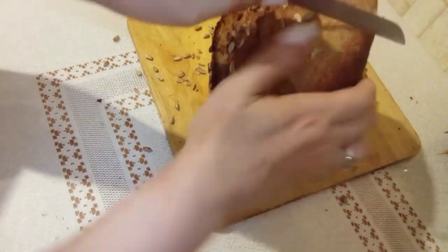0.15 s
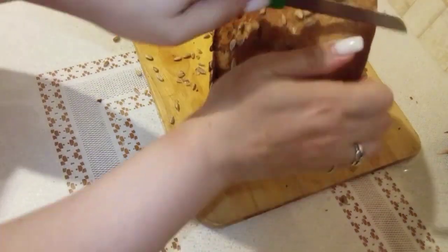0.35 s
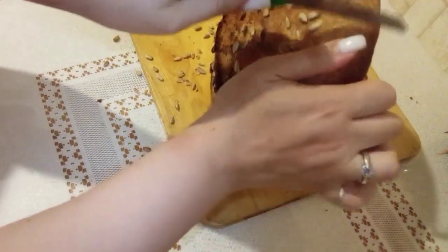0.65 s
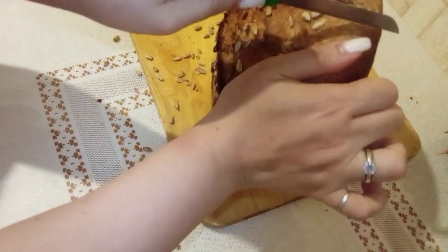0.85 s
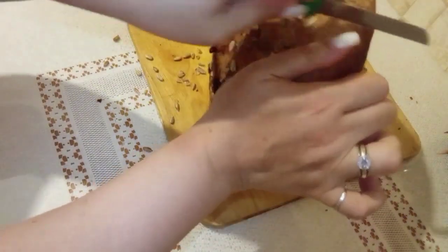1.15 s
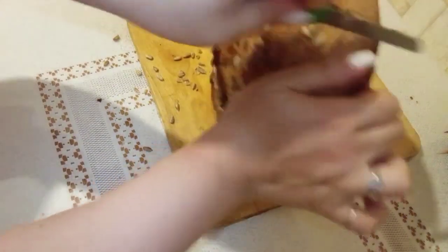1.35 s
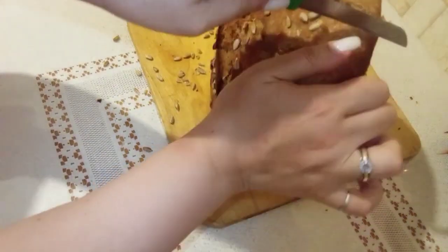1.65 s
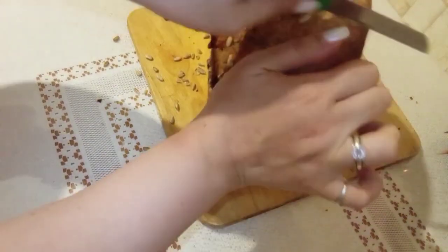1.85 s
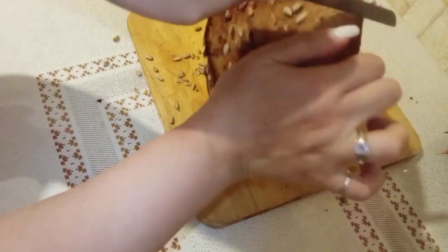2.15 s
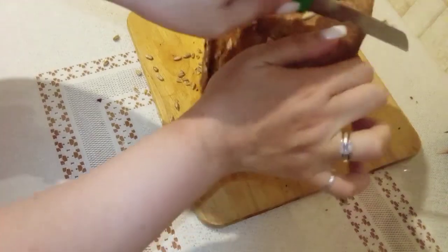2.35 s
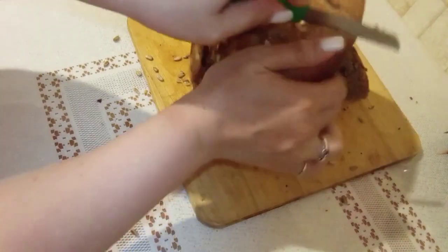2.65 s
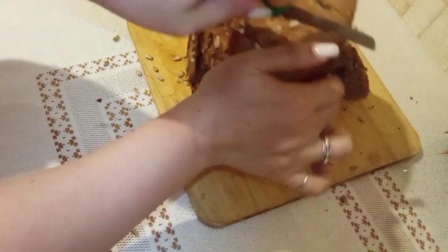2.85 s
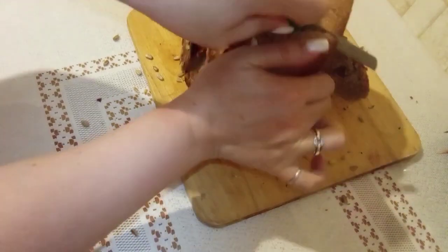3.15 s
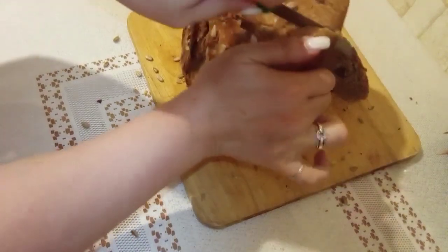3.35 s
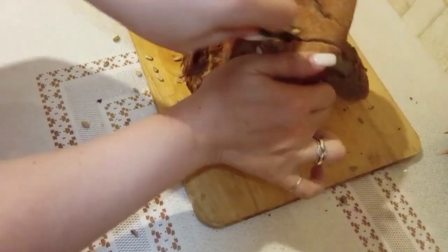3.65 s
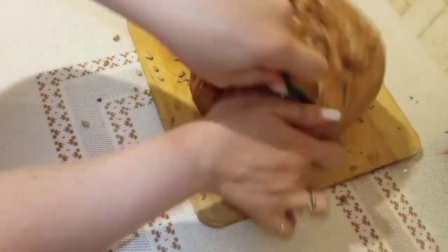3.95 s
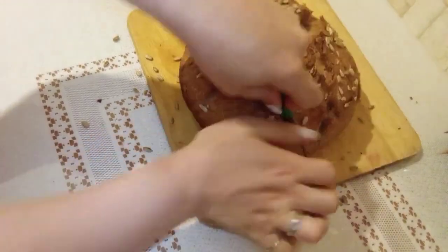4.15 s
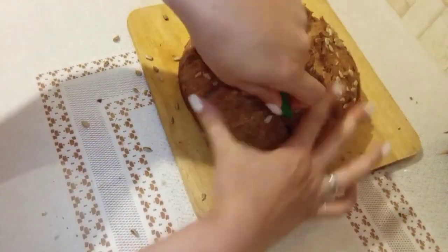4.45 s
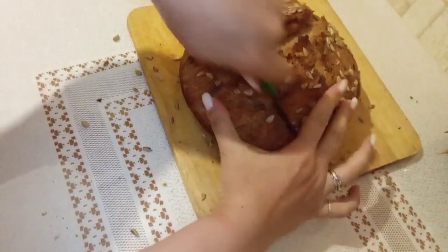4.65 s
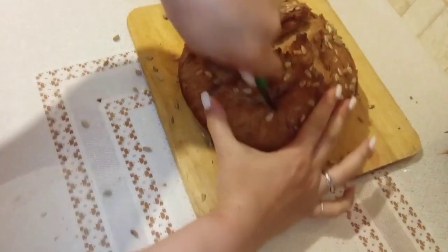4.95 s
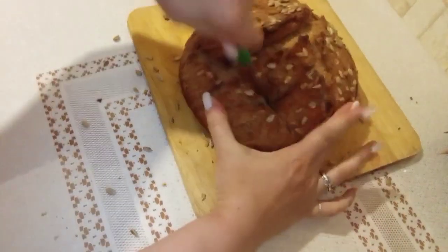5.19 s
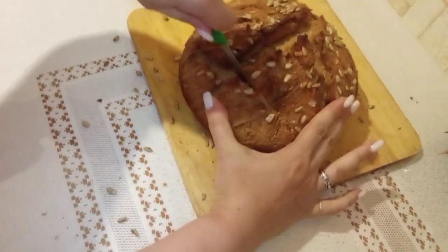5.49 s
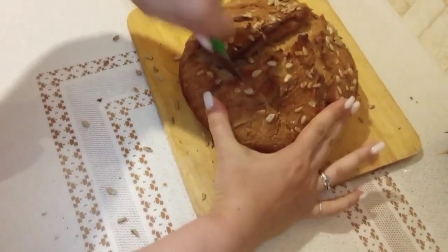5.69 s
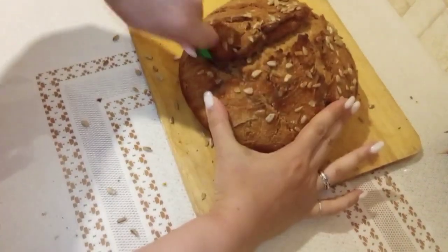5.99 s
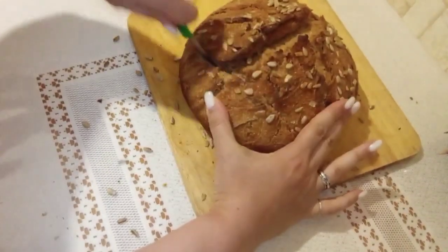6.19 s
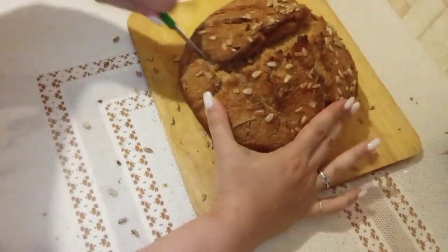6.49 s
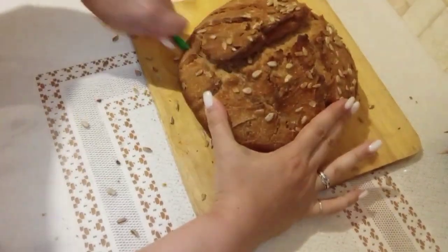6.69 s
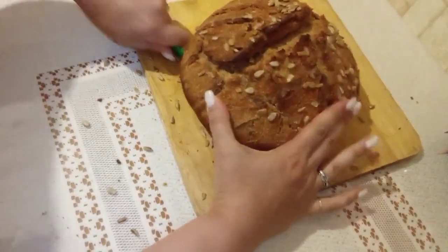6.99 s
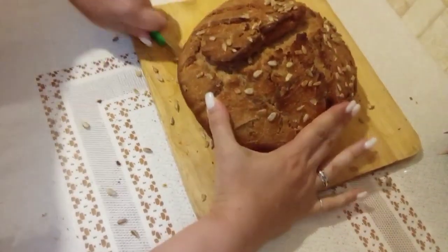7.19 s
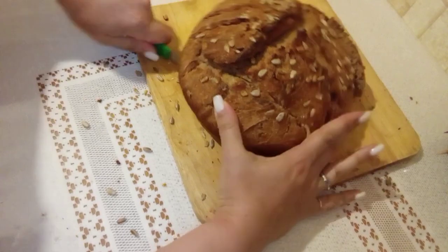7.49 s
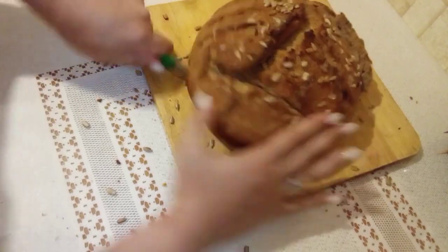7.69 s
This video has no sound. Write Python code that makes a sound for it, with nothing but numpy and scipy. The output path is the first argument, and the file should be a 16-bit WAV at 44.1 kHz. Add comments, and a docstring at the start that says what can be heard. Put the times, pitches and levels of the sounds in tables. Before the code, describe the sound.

Dry, close sound of hard bread being sawn. Quiet strokes about five a second carry fine crackle and muffled hollow jolts, with sharp crust snaps between. A burst of strong cracks arrives midway, then slower, heavier crunching strokes with ringing flakes, dull board knocks and two deeper thumps. Tiny crumb ticks and short hisses trail along. The cutting dies down into faint appliance hum in a small room.

```python
"""In a small kitchen, a serrated knife saws through a crusty loaf on a wooden board.
The catching teeth break the crust in clumps of tiny random cracks, and jolt the loaf, board and table.
Single flakes and seeds snap as ringing bursts of noise. Blade squeaks, rubs and the hissing tails after
some snaps are noise in a gliding resonance; low thumps and short low groans are decaying tones.
Crumbs tick over faint hiss and appliance hum."""
import sys
import numpy as np
from scipy import signal
from scipy.io import wavfile
from scipy.ndimage import uniform_filter1d

SR = 44100
rng = np.random.default_rng(int(sys.argv[2]) if len(sys.argv) > 2 else 0)


def wav_record(signal):
    """Record a signal, one row per channel, as 16-bit PCM in the file named by sys.argv[1]."""
    frames = np.transpose(np.atleast_2d(signal))
    bounded = np.clip(frames, -1, 1)
    # unit amplitude maps onto the largest positive 16-bit level
    quanta = np.round(bounded * 32767).astype(np.int16)
    wavfile.write(sys.argv[1], SR, quanta)


N = 345303
TIME = np.arange(N) / SR

# pushes and pulls of the knife, from deep cuts to light drags; levels and times are scaled per part later:
# start_s, rise_s, hold_s, release_s (per 20 dB), crust_db, board_db, table_db, fizz_db, hollow_hz
STROKES = [ (.95, .11, 0.05, 0.09, -57, -57.5, -47, -64.5, 362),
           (1.149, 0.079, 0.012, 0.02, -51, -47.5, -44, -59, 417),
           (1.352, 0.09, 0.0047, 0.0569, -37, -47, -58, -45.5, 765),
           (1.57, 0.049, .034, 0.07, -45, -57.5, -55, -54.5, 725),
           (1.771, 0.097, .052, 0.06, -42, -47.5, -58, -51, 428),
           (2.005, .087, .034, 0.08, -50, -56.5, -49.5, -58.5, 358),
           (2.235, .08, .03, 0.09, -56, -54.5, -50, -57.5, 335),
           (2.325, 0.052, 0.0046, .067, -48.5, -51.5, -70, -50.5, 335),
           (2.388, 0.065, 0.07, .1, -57.5, -55, -54, -69.5, 320),
           (2.799, 0.067, 0.0048, .03, -43, -66.5, -60.5, -56, 600),
           (3.066, .068, .022, 0.0332, -28, -41.5, -45, -36, 720),
           (3.157, 0.016, 0.025, 0.11, -42.5, -50, -54.5, -49, 606),
           (3.209, .12, 0.03, 0.08, -36.5, -46, -57, -43.5, 363),
           (3.434, .066, 0.037, .055, -31.5, -39.5, -42, -39, 648),
           (3.548, 0.13, 0.042, 0.03, -43, -51, -48, -54, 570),
           (3.774, 0.063, 0.011, 0.06, -43.5, -72, -67, -51, 507),
           (3.893, 0.054, 0.037, 0.1, -62.5, -56.5, -52, -69, 430),
           (4.012, .11, .045, 0.16, -55.5, -58.5, -68.5, -75, 357),
           (4.171, .017, .002, 0.053, -34.5, -35, -35, -47, 322),
           (4.59, .115, .052, .075, -45.5, -48.5, -55.5, -51, 640),
           (4.825, 0.067, 0.033, .06, -32, -33.5, -40.5, -41.5, 710),
           (5.009, 0.017, 0.11, 0.1, -60.5, -52, -55, -72.5, 680),
           (5.224, .016, .051, 0.04, -34, -32, -42.5, -44, 700),
           (5.337, 0.078, 0.0072, 0.25, -59, -60.5, -56.5, -77, 607),
           (5.572, .04, .033, 0.0628, -30.5, -37.5, -35.5, -39.5, 560),
           (5.658, 0.098, .15, .055, -48, -57.5, -47.5, -55, 560),
           (5.962, .014, .018, .048, -34, -40.5, -38, -42, 322),
           (6.061, 0.018, 0.0032, .05, -45.5, -50.5, -44, -50, 318),
           (6.244, .055, 0.026, 0.0577, -35, -42.5, -48, -47.5, 286),
           (6.42, .085, 0.019, 0.01, -62.5, -57.5, -52, -74, 217),
           (6.565, 0.083, .034, .05, -35, -46, -42, -44, 346),
           (6.734, 0.09, .076, 0.17, -55.5, -67, -75, -70, 350),
           (6.916, .04, .092, 0.038, -38, -39.5, -48.5, -62, 320),
           (7.122, 0.048, 0.044, 0.24, -72, -72, -69, -75, 690),
           (7.269, 0.052, 0.051, 0.09, -60.5, -63, -85, -71, 1030),
           (7.423, 0.058, 0.016, 0.12, -64, -69, -58, -63.5, 850),
           (7.58, 0.22, .035, .05, -59, -62, -78.5, -69.5, 667)]
# flakes and seeds that snap; level_db sets the whole snap, knock_db and crack_db are relative to its ring:
# time_s, level_db, ring_hz, knock_db, crack_db
SNAPS = [(0.308, -38, 4670, -36, 0), (0.435, -52, 1930, -9, 0), (0.467, -56.5, 4550, -15, 8),
         (0.818, -31, 750, -8, 2.5), (0.964, -53.5, 5330, -31, -5), (1.445, -30, 3530, -32, 5),
         (1.676, -33, 10100, -22, -2.5), (1.769, -51, 9800, -28, -14), (2.049, -45, 3630, -17, 2),
         (2.325, -35, 4800, -26, 2), (2.384, -37, 5860, -33, 2), (2.648, -26.5, 4950, -44, 6),
         (2.748, -45, 1790, -16, -16), (2.951, -28.5, 2830, -45, 5.5), (3.053, -35.5, 2900, -39, 5),
         (3.066, -29, 5040, -45.5, -10.5), (3.09, -31, 1900, -23, 9), (3.473, -29, 1980, -27, -1),
         (3.495, -19, 5250, -14, 4), (3.532, -19.5, 2440, -1, 3), (3.688, -29.5, 1850, -6, -13),
         (3.855, -28, 4800, -18, -2), (4.05, -34, 4800, -7.5, -14), (4.187, -21.5, 1010, 11, 8),
         (4.31, -43, 1410, -23, -18), (4.375, -44, 1440, -20, -23), (4.395, -49, 1400, -21, -20),
         (4.435, -44, 3100, -17, -4), (4.485, -33.5, 2370, -33, -18), (4.512, -33.5, 2560, -25, -9),
         (4.538, -32.5, 10000, -21, -8), (4.603, -28, 4270, -22, -15), (4.693, -31, 770, -1, -1),
         (4.813, -32, 5130, -25.5, -10), (4.863, -26.5, 1460, -15.5, -14), (4.876, -25.5, 4830, -25, -2),
         (4.893, -24.5, 794, 2, -3), (4.917, -20.5, 760, -5, -2), (5.171, -47, 14500, -30, -6),
         (5.198, -45, 4740, -34, 0), (5.211, -27.5, 14200, -31, -18), (5.235, -26.5, 735, -9, -7),
         (5.281, -19.5, 3000, -10, 5.5), (5.389, -38, 2300, -18, -8), (5.415, -34.5, 5000, -34, 1),
         (5.588, -21.5, 1340, -35, -15.5), (5.608, -20.5, 1620, -8.5, -1), (5.611, -18.5, 4460, -10.5, -8),
         (5.642, -19, 1670, -19, -3.5), (5.855, -29, 3700, -8, 2), (5.898, -29, 4960, -39, -8),
         (5.975, -26.5, 5200, -1, 3), (6.177, -28.5, 2570, -45, -3.5), (6.275, -29, 4640, -15, 0),
         (6.592, -32, 1590, -16, -4.5), (6.63, -25, 1100, -21, 0), (6.948, -29.5, 1460, -13, -12),
         (7.44, -43, 2570, -25, -27)]
# blade squeaks and rubs, and the hissing tails that die away after some snaps:
# start_s, length_s, pitch_hz, glide_hz, width_hz, level_db, fade_db
SQUEAKS_AND_TAILS = [(0.647, 0.02, 10200, 0, 1200, -74, 2), (1.669, 0.063, 10000, -200, 700, -63.5, 7),
                     (2.647, 0.1, 5300, -1300, 3800, -54, 29), (2.959, 0.097, 2870, -200, 1310, -65.5, 9),
                     (4.608, 0.042, 4260, 0, 900, -60, 11), (6.1, 0.067, 4100, -250, 300, -62.5, 16),
                     (6.185, 0.062, 2730, -300, 800, -64, 11), (6.198, 0.1, 4300, 0, 130, -67, -2),
                     (6.372, 0.18, 4830, -100, 170, -65, 5), (6.492, 0.044, 1200, 100, 700, -64, 0),
                     (6.81, 0.069, 5030, 100, 700, -60.5, 11), (7.308, 0.054, 1200, -100, 400, -58.5, 4)]
# low thumps and short low groans that die away: time_s, pitch_hz, level_db, t60_s
THUMPS_AND_GROANS = [(1.93, 133, -46, .3), (3.985, 98, -57, 0.16), (4.196, 80, -45, 0.25),
                     (5.636, 130.8, -29, 0.36), (5.991, 127.4, -30.5, .16), (6.485, 200, -54, 0.22),
                     (7.478, 124, -49, 0.19)]
# loose crumbs shifting under the hands: time_s, level_db
CRUMBS = [(0, -100), (.9, -90), (3.7, -62), (4.3, -70.5), (4.6, -63), (5.6, -80.5), (7.2, -79.5),
          (7.83, -82)]
# tone colour of the crackling crust: pitch_hz, relative_db
CRUST = [(530, -42.5), (900, -2), (1250, -7), (1420, 1), (1890, 1.5), (2040, -0.5), (2290, 1.5), (3470, 0),
         (3710, 0.5), (5100, 2), (6300, -0.5), (7940, -14.5), (9000, -14.5), (11700, -28), (19800, -120)]
# tone colour of the fine-crumb fizz: pitch_hz, relative_db
FIZZ = [(4120, -53.5), (7000, -1), (7940, -9), (9560, 0), (10000, -1), (13400, -17), (15100, -2),
        (16100, -21), (16300, -23), (16500, -37)]
# tone colour of the jolted loaf: pitch_hz, relative_db
LOAF = [(120, -32.5), (210, -2), (290, 1.5), (400, -2.5), (470, -2), (560, 4.5), (750, -1), (1000, 0.5),
        (1300, -9.5), (2000, -16.5), (4000, -41.5)]
# tone colour of the thudding table: pitch_hz, relative_db
TABLE = [(25, -50.5), (48, -30.5), (62, -3), (80, -20.5), (100, -4.5), (130, 1), (160, -8), (200, -9.5),
         (250, -15.5), (320, -16.5), (600, -59.5)]
# tone colour of the background hiss: pitch_hz, relative_db
HISS = [(25, -22), (50, -13), (80, -9), (115, 0), (160, -6), (240, -4.5), (420, -4.5), (550, -9.5),
        (1000, -15.5), (2500, -20), (6000, -22.5), (10400, -34.5), (11500, -34), (16000, -30.5)]
# ringing tones of the wooden board: pitch_hz, relative_db, t60_s
BOARD_MODES = [(259, -7, .1), (306, -2, .09), (528, -1, .09), (599, -4, .07), (662, 0, .09), (716, -2, .07),
               (790, 0, .05), (937, 2, .08), (1141, -1, .06)]
# ringing tones of the table: pitch_hz, relative_db, t60_s
TABLE_MODES = [(63, -12, .25), (99, -6, .2), (129, 0, .26)]
# how long the kitchen echoes last: pitch_hz, t60_s
KITCHEN_DECAY = [(150, 0.18), (600, 0.21), (2500, 0.17), (6000, 0.18), (12000, 0.11)]
# wavering tones of a kitchen appliance: pitch_hz, width_hz, level_db
HUM = [(97.4, 5.2, -77.5), (238.4, 31, -89), (2500, 30, -91.5)]

# how each part follows a stroke: (stretch of the rise, extra hold in s, stretch of the release)
CRUST_FOLLOW, FIZZ_FOLLOW = (1, 0, 0.96), (1.04, .0016, 0.86)
BOARD_FOLLOW, TABLE_FOLLOW = (1.162, 0.0021, 1.33), (1.88, .0095, 1.39)
BITE = 2.06  # the force grows as this power of time while the teeth dig in
HOLLOW_WOBBLE = .07  # typical pitch wobble of the soft loaf, as a share of its pitch
WOBBLE_HZ = 22.02  # new random wobble values per second
HISS_DB = -76.5
EDGE_HZ = 16200  # top of the treble


def sawing():
    """Tooth catches crack the crust and jolt loaf and board; the table's thud is returned apart."""
    teeth = tooth_catches()
    cracks = fractures(teeth, per_s=4600, spread_db=4.2, low_hz=1000, high_hz=15500, cycles=.65)
    # larger flakes ring briefly as they come loose
    flakes = fractures(teeth, per_s=150, spread_db=3.5, low_hz=1100, high_hz=5800, cycles=12)

    crackle = convolve(cracks + amp(6.5) * flakes, impulse(CRUST))
    crust = steady(crackle, size=1300) * stroke_gain(CRUST_FOLLOW, column=4) * amp(-2.5)
    fine_crumb = convolve(cracks, impulse(FIZZ))
    fizz = steady(fine_crumb, size=1300) * stroke_gain(FIZZ_FOLLOW, column=7) * amp(-3.0)

    # the catching teeth also jolt the loaf, its hollow and the board under it
    jolts = clicks(per_s=1500, spread_db=1.0) * teeth
    hollow = resonate(jolts, hollow_pitch(), width=170)
    body = convolve(jolts, impulse(LOAF)) + amp(21) * hollow
    body += amp(-5) * convolve(jolts, ring(BOARD_MODES))
    board = steady(body, size=1100) * stroke_gain(BOARD_FOLLOW, column=5) * amp(-1.0)

    thud = convolve(jolts, impulse(TABLE)) + amp(-3.5) * convolve(jolts, ring(TABLE_MODES))
    table = steady(thud, size=1500) * stroke_gain(TABLE_FOLLOW, column=6) * amp(-1.5)
    return shifting_echoes(crust + fizz) + board, table


def tooth_catches(per_s=170):
    """Each tooth snags at a random moment and lets go, over a steady drag."""
    release_s, drag = .0036, .62
    decay = np.exp(-1 / (release_s * SR))
    snags = signal.lfilter([1], [1, -decay], abs(clicks(per_s, spread_db=2.5)))
    return drag + snags


def fractures(strength, per_s, spread_db, low_hz, high_hz, cycles, count=24):
    """Tiny cracks scaled by strength; each rings at one of several pitches, fading over a few cycles."""
    t = np.arange(400) / SR
    cracks = clicks(per_s, spread_db) * strength
    kind = rng.integers(0, count, N)
    total = np.zeros(N)
    for k, hz in enumerate(np.linspace(low_hz, high_hz, count)):
        tone = unit(np.exp(-t * hz / cycles) * np.sin(2 * np.pi * hz * t))
        total += convolve(cracks * (kind == k), tone)
    return total


def stroke_gain(follow, column):
    """The force of each stroke digs in, holds and lets go; column picks its level."""
    rise_stretch, linger_s, release_stretch = follow
    power = np.zeros(N)
    for row in STROKES:
        start, rise, hold, release = row[:4]
        first = round(start * SR)
        t = TIME[:N - first][:SR]
        dig = np.minimum(t / (rise * rise_stretch), 1) ** BITE
        let_go = np.maximum(t - rise - hold - linger_s, 0)
        fade_db = -20 * let_go / (release * release_stretch)
        power[first:first + len(t)] += (dig * amp(row[column] + fade_db)) ** 2
    return np.sqrt(power)


def hollow_pitch():
    """The loaf's hollow slides in pitch as the grip changes, and wobbles as the soft loaf flexes."""
    # two points per stroke hold the pitch until partway through the release
    held = sorted((start + rise + late, hz) for start, rise, hold, release, *_, hz in STROKES
                  for late in (0, hold + release / 2))
    turns = np.arange(0, TIME[-1] + 1, 1 / WOBBLE_HZ)
    flex = np.interp(TIME, turns, rng.standard_normal(len(turns)))
    return read_curve(held) * np.exp(HOLLOW_WOBBLE * flex)


def snaps(damping=0.33, body_db=3.0, edge_db=-7, size=4096):
    """A brittle burst, the damped ring of the loose flake, and a knock into the board."""
    lead_s, rise_s, crack_s = .003, .0004, .0016
    t = (np.arange(size) - round(lead_s * SR)) / SR
    out = np.zeros(N + size)
    crust = signal.sosfilt(signal.butter(3, 1400, "high", fs=SR, output="sos"), impulse(CRUST))
    fizz = signal.sosfilt(signal.butter(4, 11500, fs=SR, output="sos"), impulse(FIZZ))
    knock = unit(impulse(LOAF, size=8192) + .5 * ring(BOARD_MODES)[:size])
    for s, level_db, hz, knock_db, crack_db in SNAPS:
        # a sharp click in a very short burst of noise that quickly dies away
        noise = rng.standard_normal(size)
        burst = noise * np.exp(np.minimum(t / rise_s, -t / crack_s)) + 3 * (t == 0)
        overtone_hz = hz * 1.574
        flake = unit(resonate(burst, hz, damping * hz))
        flake += amp(-11.5) * unit(resonate(burst, overtone_hz, damping * hz))
        parts = [(crust, crack_db), (knock, knock_db + body_db), (fizz, crack_db + edge_db)]
        snap = flake + sum(amp(db) * unit(convolve(burst, colour)) for colour, db in parts)
        out[round((s - lead_s) * SR):][:size] += amp(level_db + 13.5) * unit(snap)
    return out[:N]


def squeaks_and_tails():
    """Blade squeaks and rubs, and hissing tails after some snaps: noise held in one gliding resonance."""
    out = np.zeros(N)
    for s, length, hz, glide, width, db, fade_db in SQUEAKS_AND_TAILS:
        u = np.linspace(0, 1, round(length * SR))
        swell = np.sin(np.pi * u) ** .5 * amp(-fade_db * u)
        tone = unit(resonate(rng.standard_normal(len(u)), hz + glide * u, width) * swell)
        out[round(s * SR):][:len(u)] += amp(db) * np.sqrt(len(u)) * tone
    return out


def thumps_and_groans(rise_s=0.0084):
    """Low thumps and short low groans: a low tone sets in softly and dies away."""
    t = np.arange(SR // 3) / SR
    out = np.zeros(N)
    for s, hz, db, t60 in THUMPS_AND_GROANS:
        tone = (1 - np.exp(-t / rise_s)) * np.sin(2 * np.pi * hz * t)
        out[round(s * SR):][:len(t)] += amp(db - 60 * t / t60) * tone
    return out


def crumbs():
    """Shifting crumbs make sparse, faint ticks, each with its own short pitch."""
    ticks = fractures(1, per_s=45, spread_db=3.0, low_hz=1200, high_hz=7750, cycles=10)
    return amp(read_curve(CRUMBS)) * np.sqrt(N) * unit(convolve(ticks, impulse(CRUST)))


def room_tone():
    """Faint coloured hiss, and an appliance's hum made of narrow bands of noise."""
    tone = amp(HISS_DB) * convolve(rng.standard_normal(N), impulse(HISS))
    for hz, width, db in HUM:
        tone += amp(db) * steady(resonate(rng.standard_normal(N), hz, width), size=4000)
    return tone


def shifting_echoes(x, echo_db=-5.0, count=4, size=4096):
    """Hands, blade and board throw back short echoes that keep changing as the hands move."""
    padded, out = np.pad(x, size), np.zeros(N + 3 * size)
    window = signal.windows.hann(size, sym=False)
    # overlapping slices, each with its own random echoes
    for start in range(0, N + size, size // 2):
        taps = np.zeros(size // 16)
        taps[rng.integers(8, len(taps), count)] = rng.standard_normal(count)
        taps = amp(echo_db) * unit(taps)
        taps[0] = 1  # the direct sound
        part = np.convolve(padded[start:start + size] * window, unit(taps))
        out[start:start + len(part)] += part
    return out[size:size + N]


def kitchen(x, early_db, tail_db, count=8):
    """First echoes from the table top and hands, then the fading tail of a small room."""
    t = np.arange(SR // 2) / SR
    early = np.zeros(len(t))
    early[(rng.uniform(.001, .014, count) * SR).astype(int)] = rng.standard_normal(count)
    # sparse random echoes that build up over the first few milliseconds
    taps = rng.standard_normal(len(t)) * (rng.random(len(t)) < .15) * np.clip(t / 0.0046, 0, 1)
    # each pitch fades at its own speed
    hz, age, bands = signal.stft(taps, SR, nperseg=256)
    fade = amp(-60 * age / read(KITCHEN_DECAY, hz)[:, None])
    tail = signal.istft(bands * fade, SR, nperseg=256)[1][:len(t)]
    return x + convolve(x, amp(early_db) * unit(early) + amp(tail_db) * unit(tail))


def clicks(per_s, spread_db):
    """Random clicks of either sign, most small and a few large."""
    size = amp(spread_db * np.minimum(rng.exponential(1, N), 4))
    return size * rng.choice([-1, 1], N) * (rng.random(N) < per_s / SR)


def resonate(x, hz, width):
    """A resonance that follows the pitch hz, with steep skirts."""
    # shift the pitch down to zero, smooth twice, then shift back up
    turn = np.exp(2j * np.pi * np.cumsum(hz * np.ones(len(x))) / SR)
    r = np.exp(-np.pi * width / SR)
    smooth = signal.lfilter([(1 - r) ** 2], [1, -2 * r, r * r], x / turn + 1e-18)
    return 2 * (turn * smooth).real


def ring(modes):
    """Impulse response of a few decaying tones, as of struck wood."""
    t = np.arange(SR // 3) / SR
    total = np.zeros(len(t))
    for k, (hz, db, t60) in enumerate(modes):
        total += (-1) ** k * amp(db - 60 * t / t60) * np.sin(2 * np.pi * hz * t)
    return unit(total)


def impulse(points, size=4096):
    """A short response with the given tone colour that starts at once (minimum phase)."""
    log_gain = np.log(amp(read(points, abs(np.fft.fftfreq(size, 1 / SR)))))
    spectrum = np.exp(np.conj(signal.hilbert(log_gain)))
    return unit(np.fft.ifft(spectrum).real[:size // 2])


def steady(x, size):
    """Holds the power near one over spans of size samples; finer detail stays."""
    power = uniform_filter1d(uniform_filter1d(x ** 2, size), size)
    return x / np.sqrt(abs(power) + 1e-4 * np.mean(x ** 2))


def convolve(x, response):
    """Passes a sound through a response, keeping its length."""
    return signal.oaconvolve(x, response)[:len(x)]


def read(points, hz):
    """Reads a table on a log-frequency axis."""
    f, value = np.transpose(points)
    return np.interp(np.log(hz + 1), np.log(f + 1), value)


def read_curve(rows):
    """Joins rows of (time_s, value) by straight lines in time."""
    return np.interp(TIME, *np.transpose(rows))


def amp(db):
    """Turns decibels into a plain multiplier."""
    return 10 ** (np.asarray(db) / 20)


def unit(x):
    """Scales to an energy of one."""
    return x / np.sqrt(np.sum(x ** 2) + 1e-20)


def scene():
    """Adds kitchen echoes to the airborne sounds; thuds, thumps, groans and room tone stay without."""
    cutting, thuds = sawing()
    airborne = kitchen(cutting + squeaks_and_tails() + crumbs(), early_db=-10.5, tail_db=-11)
    # the snaps, on top of the loaf, skip the shifting echoes of the cut
    airborne += kitchen(snaps(), early_db=-9.0, tail_db=-11.0)
    return (airborne + thuds + thumps_and_groans() + room_tone())[None]


def record(dry):
    """A low-pass filter ends the treble at EDGE_HZ."""
    lowpass = signal.firwin(301, EDGE_HZ, window=("kaiser", 8), fs=SR)
    return signal.oaconvolve(dry, lowpass[None], "same")


dry = scene()
out = record(dry)
wav_record(out)
```